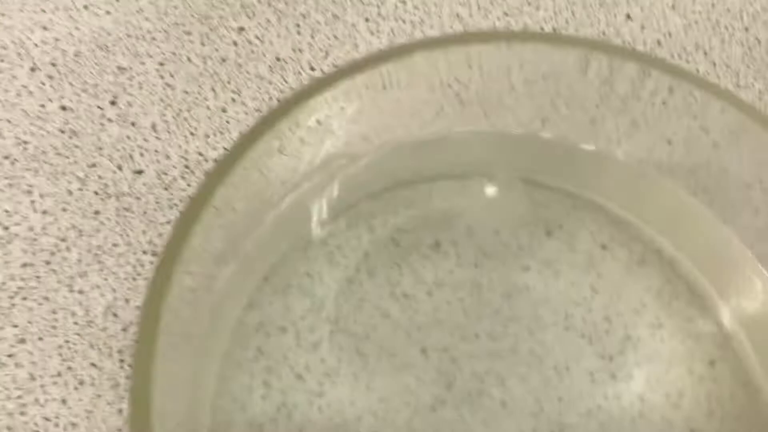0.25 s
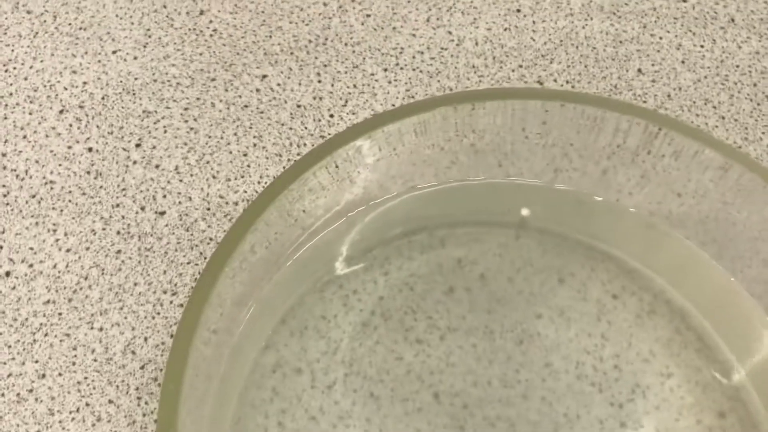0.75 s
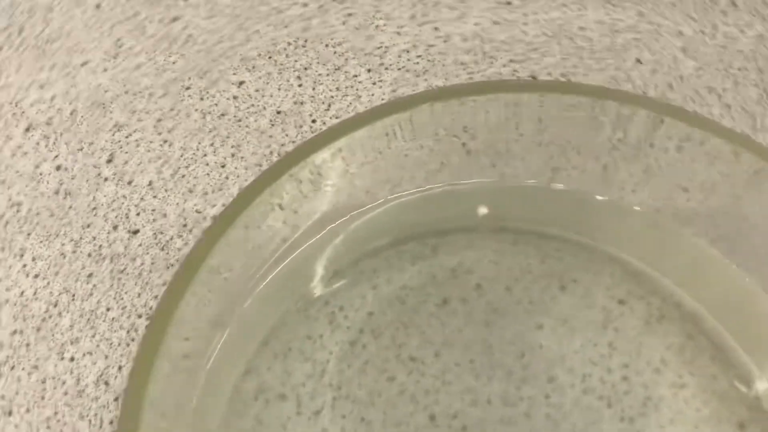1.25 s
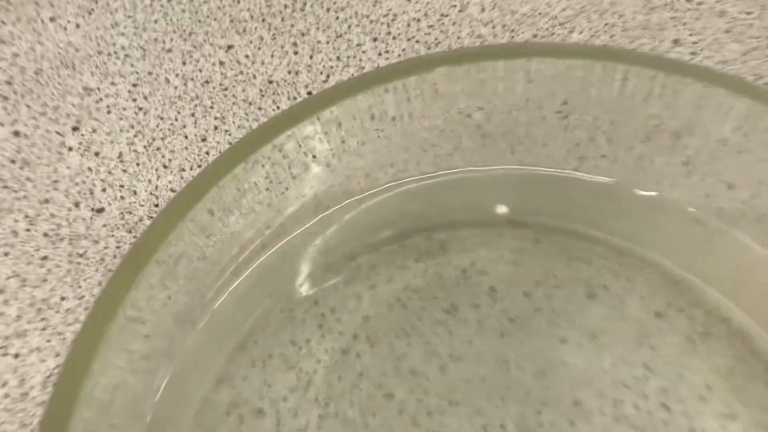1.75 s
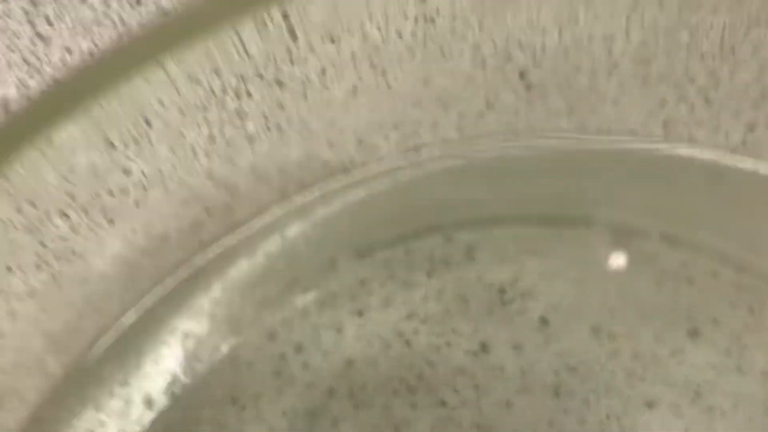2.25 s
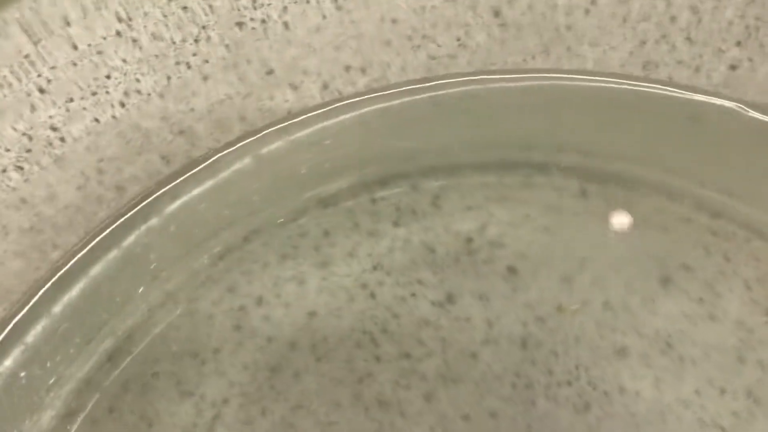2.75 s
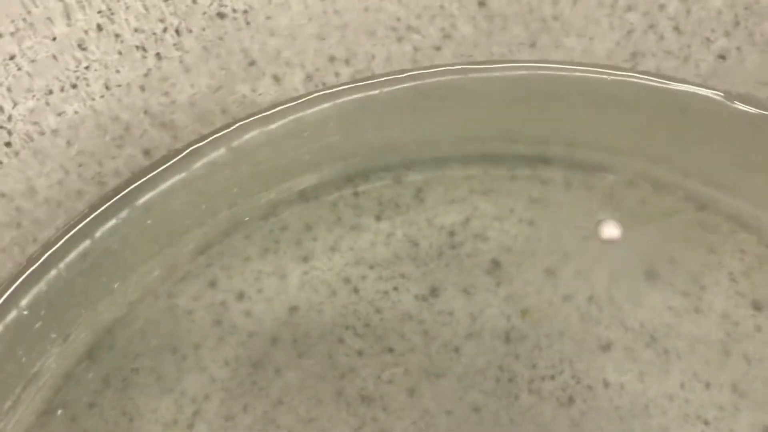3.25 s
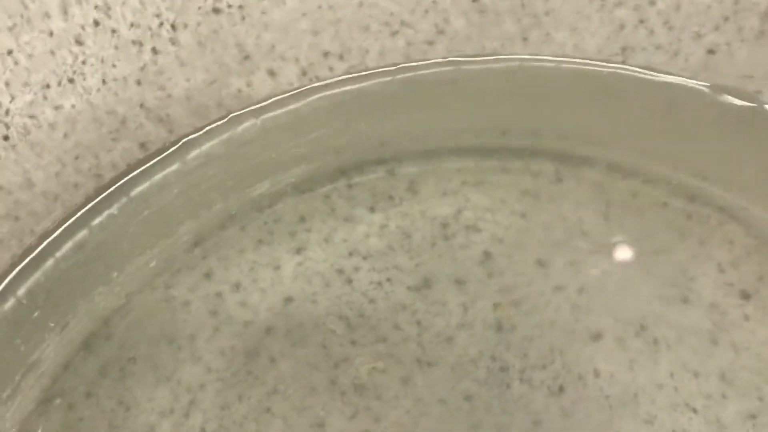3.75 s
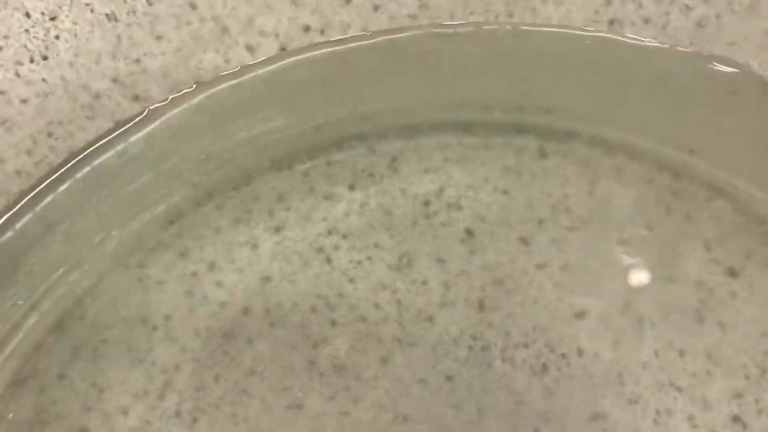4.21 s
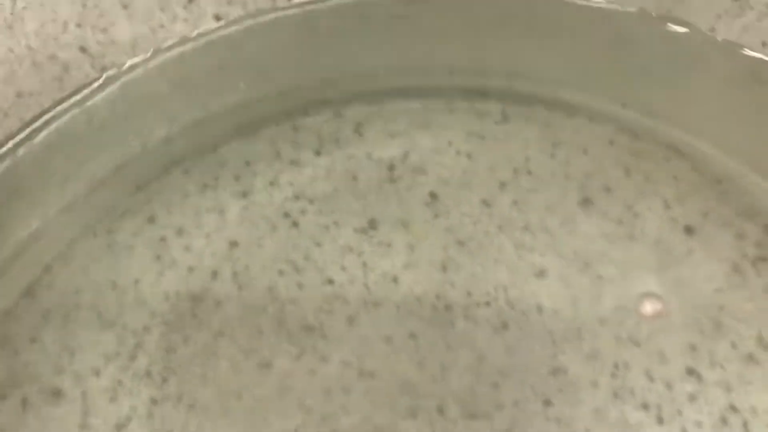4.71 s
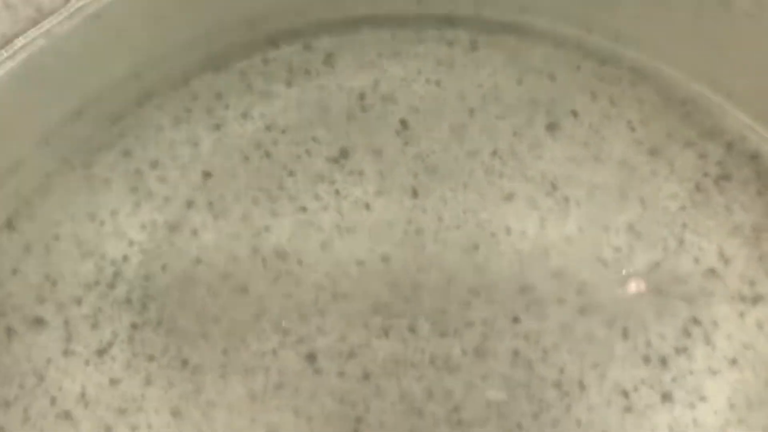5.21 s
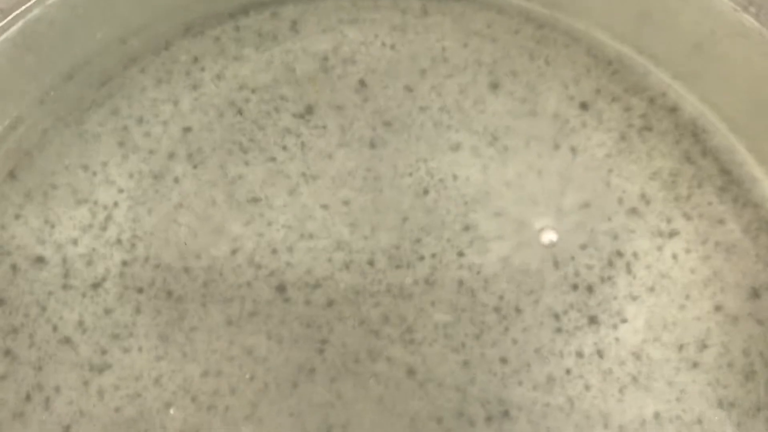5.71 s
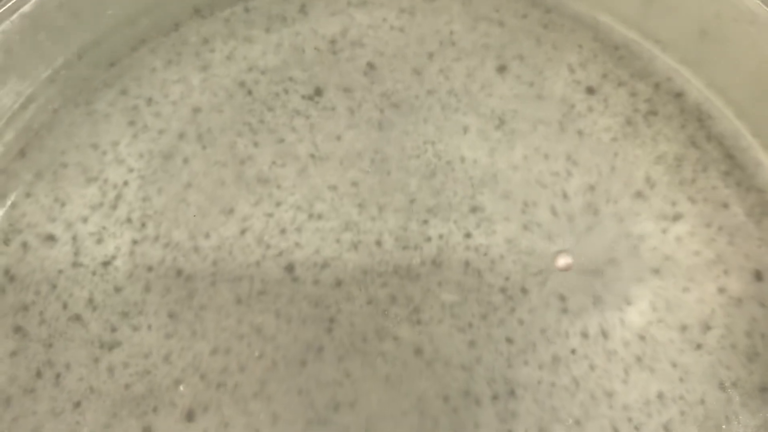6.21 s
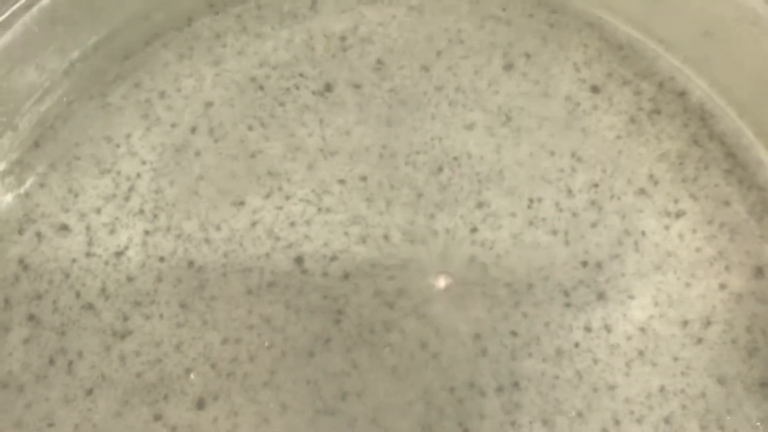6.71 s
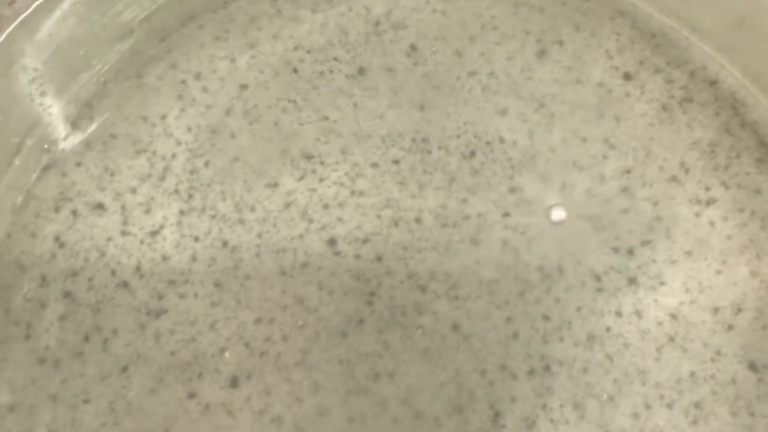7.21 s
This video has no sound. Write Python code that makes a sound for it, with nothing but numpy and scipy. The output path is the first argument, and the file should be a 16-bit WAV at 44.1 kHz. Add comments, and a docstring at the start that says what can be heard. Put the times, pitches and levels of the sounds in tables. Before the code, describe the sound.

A small metal bead fizzes steadily on water in a glass trough, with a brief rattle of dropped tweezers and a soft bump.

```python
"""Metal bead fizzing on water

A bead of reactive metal hisses and crackles with bursting gas bubbles in a round glass trough, heard
by a hand-held phone moving closer. Echoes off the trough wall and farther surfaces sweep combs through
the fizz. Tweezers drop and rattle on the bench, the phone picks up dull taps and a swell of handling
rumble, and the bench takes a soft bump. Ventilation rumbles underneath; the classroom adds reverb."""
import sys
import numpy as np
from scipy import signal
from scipy.fft import rfft, irfft, next_fast_len
from scipy.io import wavfile
from scipy.ndimage import map_coordinates

SR = 44100
rng = np.random.default_rng(int(sys.argv[2]) if len(sys.argv) > 2 else 0)


def bounce(signal):
    """Save signal as a 16-bit WAV file at the path given by the first command-line argument."""
    frames = np.transpose(np.atleast_2d(signal))
    limited = np.clip(frames, -1, 1)
    pcm = np.round(limited * 32767).astype(np.int16)
    wavfile.write(sys.argv[1], SR, pcm)


N = 328986

# Tone of the low rumble. Each row: frequency in Hz, gain in dB.
RUMBLE_EQ = [(15, -50), (30, -11), (48, -1), (110, -3), (250, -1.5), (450, -8.5), (800, -9.5), (1200, -4.5),
             (1500, -44), (3000, -120)]
# The classroom's tail. Each row: frequency in Hz, time to fall 60 dB in seconds.
ROOM_DECAY = [(150, 0.78), (1000, 1.1), (3000, 0.8), (7000, 0.55), (12000, 0.36)]
# Taps on the phone body. Each row: start in seconds, relative level in dB, pitch in Hz.
PHONE_TAPS = [(4.765, -41, 209), (5.047, -42, 192), (5.066, -41, 164)]
# Ring of the bench top and of the tweezer steel.
# Each row: frequency in Hz, relative level in dB, time to fall 60 dB in seconds.
BENCH_MODES = [(162, 0, 1.05), (207, -4, .3), (238, 2, .5), (400, -5, .06), (680, -4, .06), (950, -4, .2),
               (1460, -4, .02)]
STEEL_MODES = [(6105, -3, 0.016), (12050, -11, 0.044)]
# The tweezers bouncing. Each row: start in seconds, relative level in dB.
TWEEZER_HITS = [(1.422, -13.5), (1.4287, -6), (1.4436, -31), (1.4517, -33), (1.4647, -32), (1.483, -14.5),
                (1.497, -30), (1.509, -35), (1.5228, -28), (1.5425, -16.5), (1.5572, -20)]
# Tone of the tweezers' clack and of the fizz. Each row: frequency in Hz, gain in dB.
CLACK_EQ = [(100, -42), (200, -16), (660, -1.5), (1500, 0.5), (3300, -3), (4100, -2.5), (5900, -7),
            (7400, -7.5), (12400, -15), (16000, -13)]
FIZZ_EQ = [(150, -9), (350, -8), (700, 2), (1100, 0), (2900, -1), (3500, 0.5), (7200, 1.5), (7800, 0.5),
           (8500, 2.5), (10400, 0), (11200, 2), (12700, 4.5), (16000, 3.5)]
# Fader ride on the fizz. Each row: time in seconds, gain in dB.
FIZZ_RIDE = [(0.0, -44.5), (0.2, -41.5), (0.65, -47), (1.25, -45), (1.75, -42.5), (2.15, -38.5),
             (2.95, -38.5), (4.35, -39.5), (4.75, -40), (5.15, -40), (5.55, -41.5), (5.95, -40),
             (6.15, -42), (6.5, -39), (6.95, -41.5), (7.46, -40)]
# Bands where the fizz whistles or turns hollow for a while.
# Each row: start and end in seconds, centre and width in Hz, gain in dB.
WHISTLE_BANDS = [(-0.1, 1.4, 1520, 390, -5), (-0.1, 1.9, 380, 160, -5), (-0.1, 1.4, 4000, 700, 2.5),
                 (2.1, 5.4, 680, 140, 4), (2.1, 5.0, 960, 200, -3), (2.1, 4.6, 1750, 170, 4),
                 (2.1, 4.8, 2000, 180, -4.5), (2.2, 4.0, 5370, 130, 6), (2.2, 4.0, 5970, 130, -7),
                 (4.15, 5.3, 3390, 110, 8), (4.15, 5.22, 4490, 160, 4.5), (4.15, 5.22, 5420, 300, 5.5),
                 (4.8, 7.6, 1310, 150, -4), (4.8, 7.6, 1990, 360, 8), (5.0, 7.6, 2620, 210, 5.5),
                 (5.4, 7.6, 720, 400, 3.5), (5.4, 7.6, 4780, 50, 12), (6.25, 7.6, 5480, 400, 6.5),
                 (6.25, 7.6, 6150, 160, 8)]
# Echo off the near glass wall, later as the bead swims away. Each row: time in seconds, delay in ms.
WALL_DELAY = [(0.0, 0.111), (0.4, 0.076), (0.62, 0.055), (0.85, 0.032), (1.58, 0.036), (1.75, 0.054),
              (1.95, 0.059), (2.35, 0.094), (2.95, 0.101), (3.55, 0.125), (3.95, 0.128), (4.35, 0.194),
              (4.75, 0.206), (5.15, 0.265), (5.4, 0.22), (5.75, 0.282), (5.98, 0.259), (6.35, 0.339),
              (6.55, 0.362), (7.2, 0.324), (7.46, 0.34)]
# Two long paths, open while the phone hangs over the rim.
# Each row: relative strength, phase turn in radians, a list of (time in seconds, delay in ms).
RIM_PATHS = [(.48, 2.1, [(1.8, 0.996), (2.2, 0.758), (3.9, 0.749), (4.2, 0.729), (5.3, 0.758)]),
             (.32, -.25, [(2.2, 1.784), (3.0, 1.744), (3.4, 1.76), (4.4, 1.682)])]
# Single echoes that come and go as bead and phone move.
# Each row: start and end in seconds, first and last delay in ms, relative strength, phase turn in radians.
FAR_ECHOES = [(-0.1, 0.6, 0.245, 0.234, 0.25, 0.4), (-0.1, 0.8, 1.463, 1.394, 0.17, -3.4),
              (-0.1, 4.4, 0.351, 0.355, 0.2, 1.4), (2.2, 2.8, 1.266, 1.215, 0.3, -0.9),
              (2.5, 3.6, 1.027, 1.073, 0.29, -2.4), (3.2, 4.6, 0.856, 0.822, 0.51, -0.5),
              (3.6, 4.6, 1.08, 1.004, 0.26, -2.0), (4.5, 5.22, 1.011, 0.98, 0.43, 2.8),
              (4.5, 5.3, 1.229, 1.252, 0.56, -2.9), (5.22, 5.45, 0.98, 1.13, 0.55, 2.8),
              (5.25, 6.25, 0.473, 0.411, 0.32, 1.9), (5.3, 6.25, 0.697, 0.678, 0.27, -2.1),
              (5.3, 6.3, 0.881, 0.878, 0.38, 2.1), (5.6, 6.3, 1.415, 1.408, 0.25, -1.1),
              (5.6, 6.3, 1.849, 1.879, 0.2, -0.1), (6.25, 6.9, 0.4, 0.421, 0.55, 2.4),
              (6.25, 6.9, 0.648, 0.608, 0.28, 2.8), (6.25, 6.9, 0.989, 0.934, 0.32, -1.4),
              (6.25, 6.9, 1.19, 1.243, 0.24, -2.6), (6.3, 7.6, 1.399, 1.466, 0.16, -1.3),
              (6.9, 7.6, 0.879, 0.861, 0.39, 1.5), (6.9, 7.6, 1.055, 1.055, 0.26, 0.8),
              (6.9, 7.6, 1.273, 1.315, 0.28, 0.5)]


def amp(db):
    """Gain of a level in dB."""
    return 10 ** (np.asarray(db) / 20)


def unit_rms(x):
    """x scaled to an rms of 1."""
    return x / np.sqrt(np.mean(x ** 2) + 1e-20)


def at_hz(points, hz):
    """A curve of (Hz, value) points, read on a log axis."""
    freqs, values = np.transpose(points)
    return np.interp(np.log(hz + 1), np.log(freqs + 1), values)


def at_time(points, t):
    """A curve of (seconds, value) points, read at times t."""
    return np.interp(t, *np.transpose(points))


def gate(t, start, end, fade_s=.15):
    """1 inside the span, 0 outside, with straight fades across its ends."""
    return np.clip(np.minimum(t - start, end - t) / fade_s + .5, 0, 1)


def wobble(per_s):
    """A smooth random curve with per_s knots a second, 400 at most."""
    knots = rng.standard_normal(int(N * 400 / SR) + 9)
    return map_coordinates(knots, [np.arange(N) * min(per_s, 400) / SR])


def filtered(x, response):
    """x through an EQ whose gain is response(hz)."""
    size = next_fast_len(N + SR // 2)
    return irfft(rfft(x, size) * response(np.fft.rfftfreq(size, 1 / SR)), size)[..., :N]


def ring(modes, spread_db):
    """One blow's ring: damped sines, each at a freshly drawn strength."""
    t = np.arange(SR) / SR
    return sum(amp(db + spread_db * rng.standard_normal() - 60 * t / t60) * np.sin(2 * np.pi * hz * t)
               for hz, db, t60 in modes)


def ventilation_and_handling():
    """Steady ventilation rumble, plus one deep swell of handling rumble as the hand shifts on the phone."""
    t = np.arange(N) / SR
    rumble = unit_rms(filtered(rng.standard_normal(N), lambda hz: amp(at_hz(RUMBLE_EQ, hz))))
    deep = filtered(rumble, lambda hz: 1 / (1 + (hz / 100) ** 4))
    opening_db = 7 * np.exp(-t / 1.2)  # the deep end starts louder and settles
    handling_db = 8 * np.exp(-((t - 5.27) / .2) ** 2)
    return amp(-54.5 + opening_db + handling_db) * deep + amp(-56) * (rumble - deep)


def classroom(send):
    """Reverb: a noise tail in which each frequency dies at its own speed."""
    hz, t, noise = signal.stft(rng.standard_normal(SR), SR, nperseg=256)
    tail = signal.istft(noise * amp(-60 * t / at_hz(ROOM_DECAY, hz)[:, None]), SR, nperseg=256)[1]
    predelayed = np.pad(send, (300, 0))
    return signal.fftconvolve(predelayed, tail / np.linalg.norm(tail))[:N]


def phone_taps():
    """Each tap on the phone body is one low push, a sine that dies at once."""
    track, t = np.zeros(N + SR), np.arange(SR // 10) / SR
    for start, db, hz in PHONE_TAPS:
        track[round(start * SR):][:len(t)] += amp(db + 3 - 60 * t / .032) * np.sin(2 * np.pi * hz * t)
    return track[:N]


def bench_bump():
    """A soft, rough push rubs and shakes the bench; midway it takes the weight and its low modes boom."""
    start_s, rise_s, hold_s, release_s, weight_s = 6.575, .037, .085, .04, 6.64
    t = np.arange(N) / SR
    lets_go = start_s + rise_s + hold_s
    pressure = np.clip(np.minimum((t - start_s) / rise_s, 1 - (t - lets_go) / release_s), 0, 1) ** 2
    push = amp(-11.5) * pressure * rng.standard_normal(N)
    weight = amp(-14) * np.exp(-((t - weight_s) / .0008) ** 2)
    boom = signal.fftconvolve(amp(-9) * push + weight, ring(BENCH_MODES, spread_db=1))[:N]
    rub = filtered(push, lambda hz: (hz / 130) ** 4 / (1 + (hz / 130) ** 4) / (1 + (hz / 600) ** 4))
    scuff = filtered(push, lambda hz: 1 / (1 + ((hz - 1450) / 280) ** 2))
    return amp(-56) * boom + amp(-10.5) * rub + amp(-17.5) * scuff


def tweezers():
    """Every bounce clacks, rings the steel and knocks the bench, too lightly for its lowest mode."""
    clacks, rings = np.zeros((2, N + SR))
    t = np.arange(SR) / SR
    snap = amp(-60 * t / .017) + .12 * amp(-60 * t / .075)
    for start, db in TWEEZER_HITS:
        onset = round(start * SR)
        clacks[onset:][:SR] += amp(db) * snap * rng.standard_normal(SR)
        steel = amp(-15) * ring(STEEL_MODES, spread_db=7)
        bench = amp(-32) * ring(BENCH_MODES[1:], spread_db=.5)
        rings[onset:][:SR] += amp(db) * (steel + bench)
    return amp(-.5) * filtered(clacks[:N], lambda hz: amp(at_hz(CLACK_EQ, hz))) + rings[:N]


def echo_combs(hz, t):
    """The direct sound plus its echoes: as the delays drift, comb notches sweep through the fizz."""
    def delayed(ms, turn=0):
        return np.exp(1j * (turn - 2 * np.pi * hz * ms / 1000))

    wall_ms = at_time(WALL_DELAY, t)
    wall = delayed(wall_ms)
    # The wall echo is strongest with the bead at the glass, weaker out in open water.
    wall_strength = .58 + .39 * np.exp(-(wall_ms / .078) ** 2)
    far = np.zeros_like(wall)
    for strength, turn, delays in RIM_PATHS:
        far += strength * gate(t, delays[0][0], delays[-1][0]) * delayed(at_time(delays, t), turn)
    far *= 1 + 1.16 * wall  # the near wall doubles each rim path
    for start, end, first_ms, last_ms, strength, turn in FAR_ECHOES:
        fade = gate(t, start, end)
        live = fade > 0
        delay_ms = first_ms + (last_ms - first_ms) * (t[live] - start) / (end - start)
        far[:, live] += strength * fade[live] * delayed(delay_ms, turn)
    far *= hz / np.hypot(hz, 4500)  # small surfaces return little bass
    khz = hz / 1000
    wall_dulling, far_dulling = amp(-.17 * khz), amp(-.54 * khz)  # bounces lose treble
    return 1 + wall_strength * wall * wall_dulling + far * far_dulling


def whistles_db(hz, t):
    """Narrow peaks and dips that fade in and out of the fizz."""
    return sum(gate(t, start, end) * db / (1 + (2 * (hz - centre) / width) ** 2)
               for start, end, centre, width, db in WHISTLE_BANDS)


def bubble_pops(per_s, spread_db):
    """Gas bubbles bursting at random: single spikes, many small and a few larger."""
    chance, size, sign = rng.random((3, N))
    strength = amp(-spread_db * np.log(size + .03))
    return unit_rms((chance < per_s / SR) * strength * np.sign(sign - .5))


def sputter(shared_db):
    """One layer of hiss and pops, its own flutter riding on the shared one."""
    flutter = amp(shared_db + .68 * wobble(20) + .66 * wobble(130))
    return flutter * (rng.standard_normal(N) + .86 * bubble_pops(per_s=900, spread_db=4))


def bead_fizz():
    """The bead gives off gas: small bubbles make the top, large ones the body, partly in step."""
    def low_share(hz):
        return 1 / (1 + (hz / 5000) ** 4)

    shared_db = .5 * wobble(9) + .48 * wobble(40) + .59 * wobble(120)
    small, large = sputter(shared_db), sputter(shared_db)
    body = filtered(large, lambda hz: np.sqrt(low_share(hz)))
    top = filtered(small, lambda hz: np.sqrt(1 - low_share(hz)))
    frames = dict(nperseg=2048, noverlap=1664)
    hz, t, gas = signal.stft(unit_rms(body + top), SR, **frames)
    hz = hz[:, None]
    gain_db = at_time(FIZZ_RIDE, t) + at_hz(FIZZ_EQ, hz) + whistles_db(hz, t)
    return signal.istft(gas * echo_combs(hz, t) * amp(gain_db), SR, **frames)[1][:N]


def scene():
    """The mono mix: fizz, tweezers and bump feed the reverb; taps and rumble stay dry."""
    fizz, rattle, bump = bead_fizz(), tweezers(), bench_bump()
    reverb = classroom(amp(-13) * fizz + amp(-3) * rattle + amp(-7.5) * bump)
    return (fizz + rattle + bump + reverb + phone_taps() + ventilation_and_handling())[None]


def record(dry):
    """The phone rolls off the deepest bass and keeps nothing above its band limit."""
    low_cut_hz, top_hz = 38, 15750
    return filtered(dry, lambda hz: (hz < top_hz) * hz ** 3 / (hz ** 3 + low_cut_hz ** 3))


dry = scene()
out = record(dry)
bounce(out)
```